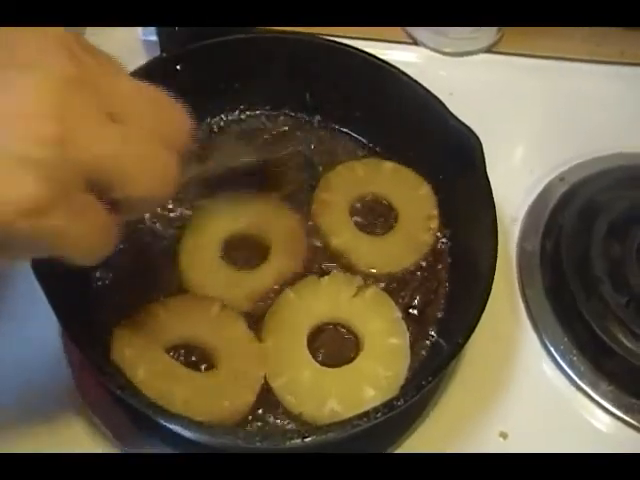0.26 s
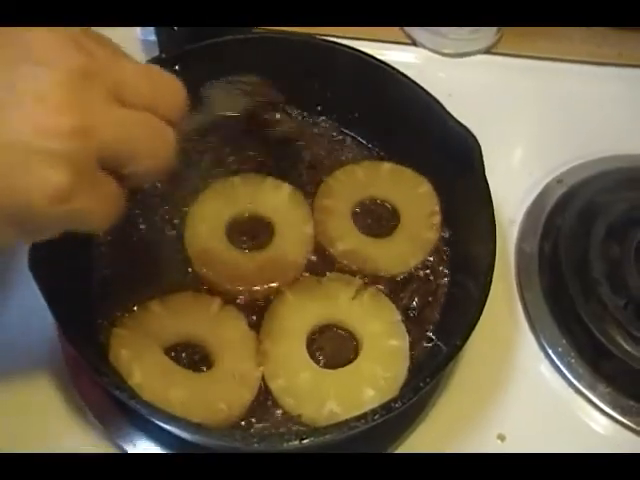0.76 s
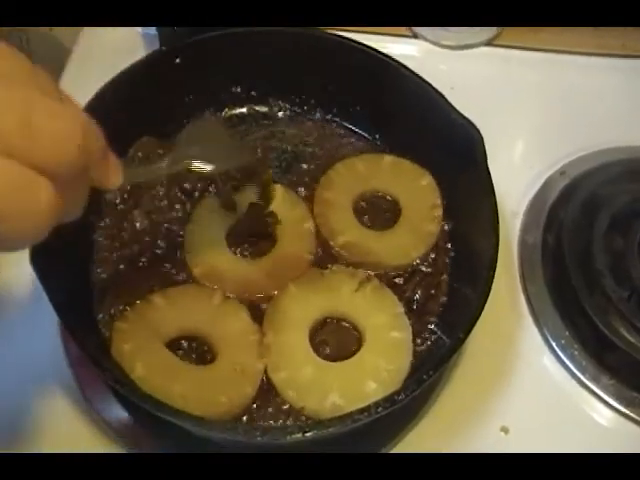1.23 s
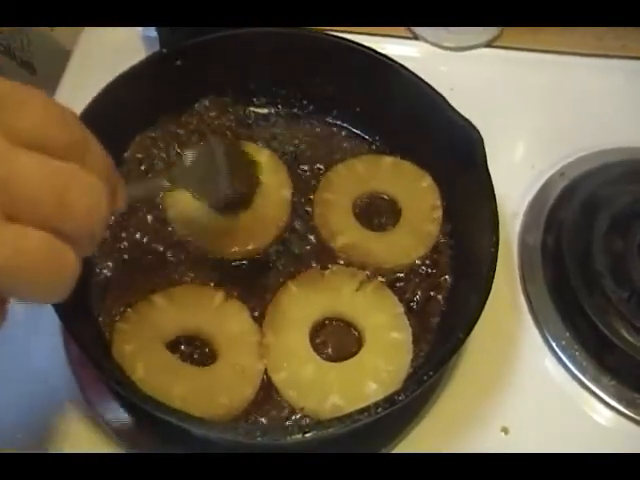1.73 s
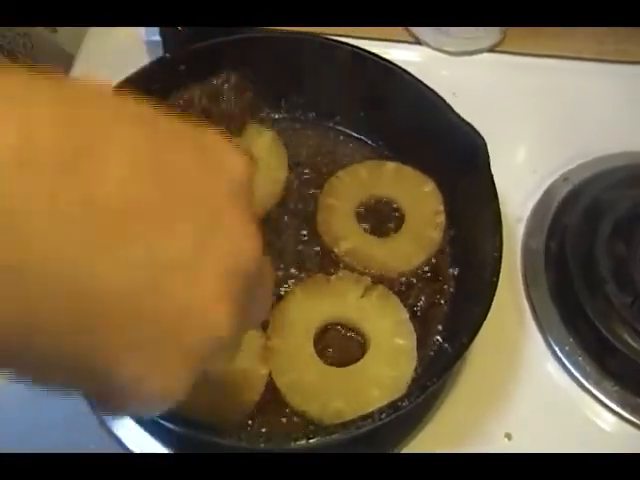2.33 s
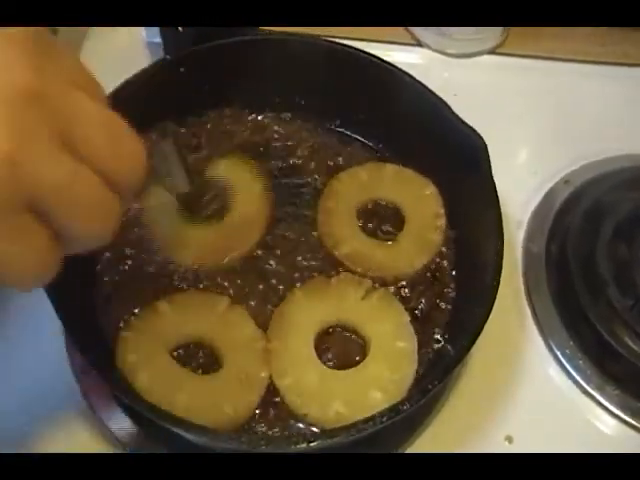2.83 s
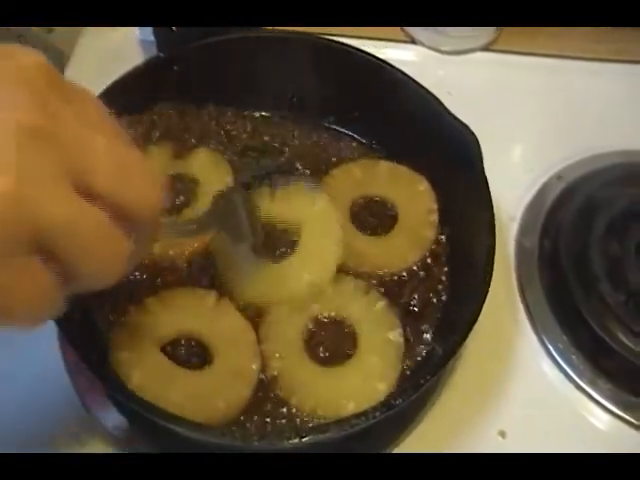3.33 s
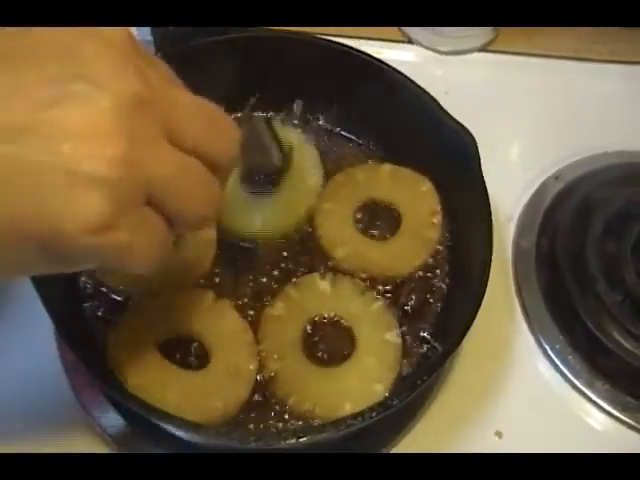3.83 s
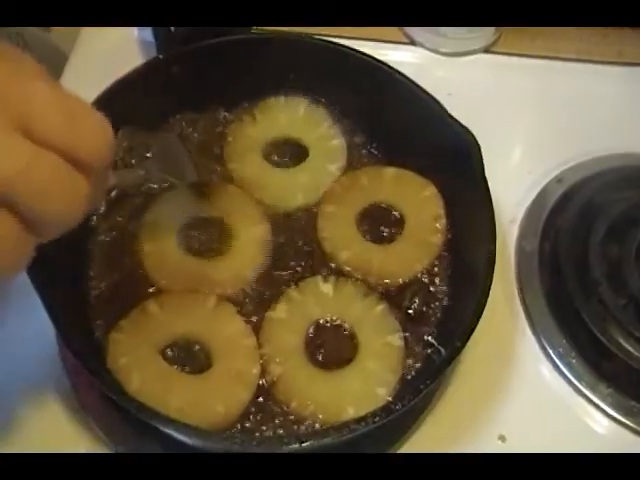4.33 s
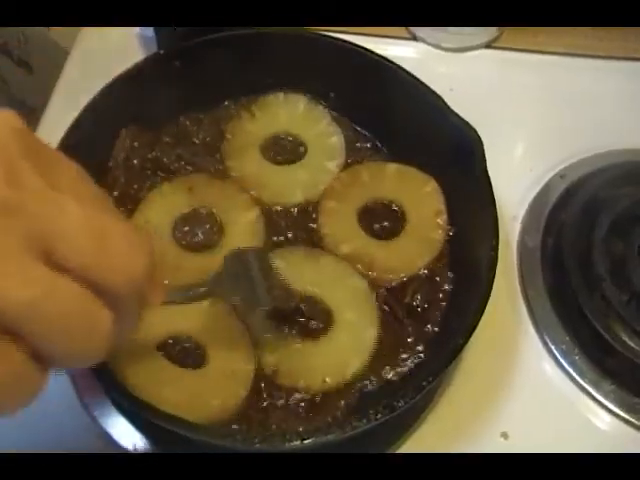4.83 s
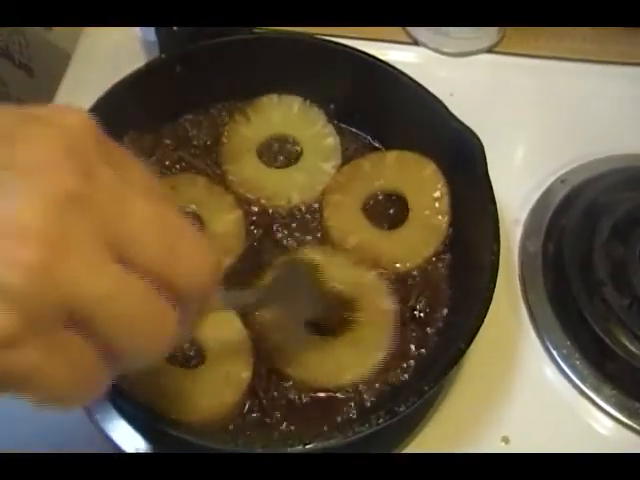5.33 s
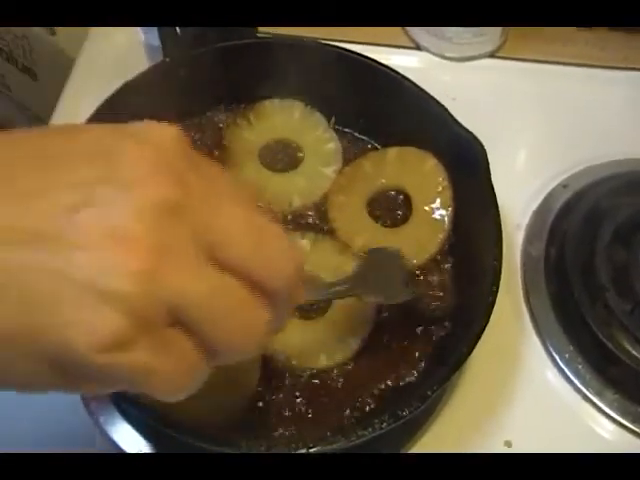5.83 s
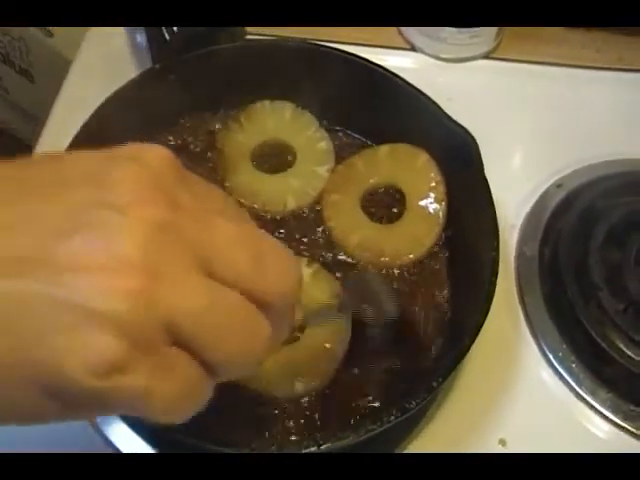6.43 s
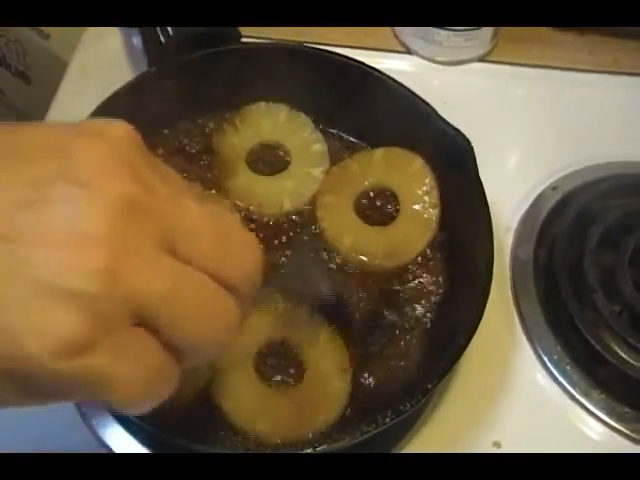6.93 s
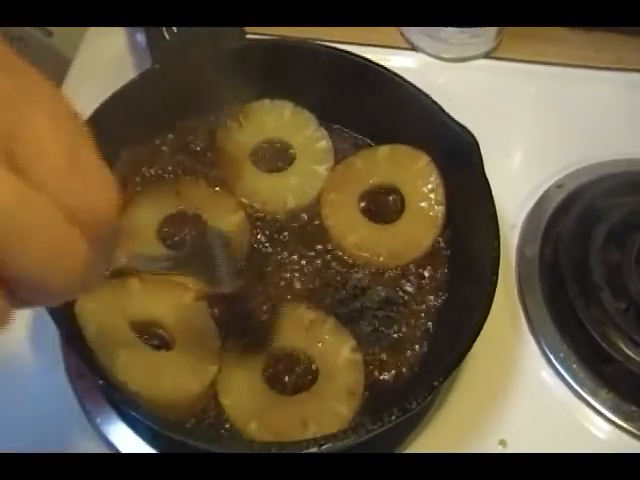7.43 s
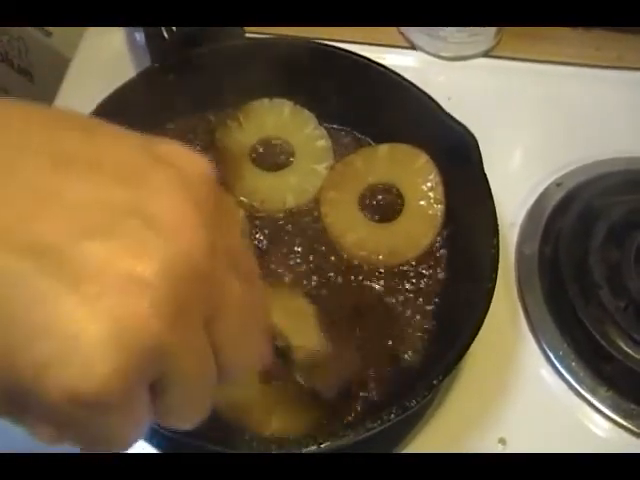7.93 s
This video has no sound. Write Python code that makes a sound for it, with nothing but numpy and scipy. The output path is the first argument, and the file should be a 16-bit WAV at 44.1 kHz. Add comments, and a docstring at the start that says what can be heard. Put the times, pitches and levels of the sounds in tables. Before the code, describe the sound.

Close, dense frying of fruit in bubbling syrup, broken by short metallic fork scrapes, dull pan shifts on the burner and snapping pops.

```python
"""Pineapple rings fry in bubbling caramel in a cast-iron pan on an electric stove, heard from close above.
Throughout: thousands of damped bubble rings a second over noise froth, flaring where syrup meets bare hot
iron; low rumble, hum and a faint pan tone. From 0.2 s a fork scrapes and knocks (stick-slip jolts drive pan
modes); from 0.5 s the pan shifts on its burner (the same on stove modes). At 1.3 s a dragged ring groans
(arching low tone), at 1.9 s the first loud syrup spit snaps (damped sine, spray); the fork resumes at 3.1 s."""
import sys
import numpy as np
from scipy import signal
from scipy.fft import rfft, irfft
from scipy.io import wavfile
from scipy.ndimage import uniform_filter1d

SR = 44100
rng = np.random.default_rng(int(sys.argv[2]) if len(sys.argv) > 2 else 0)


def inscribe(sig):
    """Save sig as 16-bit PCM at rate SR to the path in sys.argv[1].

    A 1-D sig is mono; a 2-D sig holds one channel per row.
    Samples are clipped to [-1, 1] before scaling.
    """
    pcm = np.round(np.clip(np.atleast_2d(sig).T, -1, 1) * 32767)
    wavfile.write(sys.argv[1], SR, pcm.astype(np.int16))


N = 360297
TIME = np.arange(N) / SR
BINS = np.fft.rfftfreq(N, 1 / SR)

# frying strength: [t/s, bubbling strength/dB, fine spray strength/dB]
FRYING_STRENGTH = [(0.0, -23, -25.5), (0.55, -23, -26), (1.25, -24.5, -26.0), (1.6, -26.5, -27.5),
                   (2.3, -26.5, -28.5), (2.9, -27.5, -29.5), (3.35, -29, -28), (3.68, -27.6, -30.1),
                   (4.0, -23.5, -28.0), (4.48, -22, -28), (4.7, -26.5, -26), (5.1, -25.5, -26.5),
                   (5.85, -21.5, -25.5), (6.35, -23.7, -26.5), (6.7, -22.9, -25.5), (7.5, -23.5, -25.5),
                   (8.17, -26.5, -27)]
# sizzle colour: [f/Hz, relative level/dB]
SIZZLE_COLOUR = [(200, -12), (450, -15.5), (620, -14), (720, -8.5), (950, -11), (1180, -9.5), (1330, -2),
                 (2300, -2), (2950, -4), (4600, -3.5), (5700, -5), (6900, -9.5), (9000, -7), (12000, -13)]
# resonances of the pan hollow: [f/Hz, width/Hz, lift/dB]
HOLLOW_RESONANCES = [(690, 45, 4.5), (801, 99, 9), (824, 20, -16.5), (946, 72, 6), (1066, 29, 5.5),
                     (1050, 39, -5), (1470, 280, 2.5), (1740, 83, -3), (2120, 130, 2.5)]
# weight of spray strength against bubbling strength at each pitch: [f/Hz, share 0-1]
SPRAY_FOLLOWING = [(2300, 0.42), (4200, 0.58), (7500, 1)]
# syrup pushed onto bare hot iron: [t/s, length/s, lift/dB, f/Hz]
SYRUP_FLARES = [(0.18, 0.14, 2, 3000), (0.465, 0.056, 1, 7000), (0.848, .12, 1.5, 5930),
                (1.864, .04, 2.5, 5000), (3.203, .06, 2, 4500), (3.493, .03, 3, 4500),
                (3.66, 0.035, 3.5, 4000), (3.856, 0.069, 3.5, 4500), (3.93, .05, 4, 5500),
                (4.093, 0.087, 2.5, 3800), (5.138, 0.063, 5, 5200), (5.214, 0.035, 6.5, 6000),
                (5.315, .07, 4.8, 6200), (5.46, 0.086, 2.7, 4400), (5.6, .17, 3.5, 5070),
                (5.64, 0.069, 4.5, 10600), (6.555, 0.064, 3, 9000)]
# spells of ringing colour in the sizzle: [start t/s, end t/s, f/Hz, lift/dB]
RINGING_SPELLS = [(.1, 2.6, 5560, 2), (3.9, 5.1, 2150, 3.5), (4.25, 5.2, 1540, 4.5), (5.15, 5.5, 3280, 3),
                  (6.95, 7.3, 2700, 4.5)]
# fork strokes on the iron: [t/s, length/s, level before trim/dB, chatter at start f/Hz, bite 0-1]
FORK_STROKES = [(0.183, 0.13, -26.5, 830, 0), (0.554, .06, -17.5, 760, 1), (0.894, 0.086, -18.5, 1320, 0.4),
                (3.102, 0.035, -25.5, 850, .15), (3.556, .026, -25.5, 760, 0.3),
                (3.67, 0.084, -27.5, 760, 0), (3.731, 0.069, -20.5, 880, 1), (4.047, 0.024, -27.5, 800, 0),
                (4.105, 0.055, -22, 770, .35), (5.414, 0.03, -21.5, 802, 0.04),
                (5.57, 0.13, -28, 790, 0.06), (5.739, 0.042, -26, 790, 0.1), (6.376, 0.068, -22, 830, .1),
                (6.46, 0.085, -25, 900, 0.25), (6.877, 0.062, -25, 880, 0.3),
                (7.24, 0.096, -27.5, 910, 0.3), (7.47, 0.095, -23.5, 756, 0.44),
                (7.742, 0.028, -31, 800, 0), (8.115, 0.066, -23.5, 850, .15)]
# pan modes: [f/Hz, relative level/dB, t60/s]
PAN_MODES = [(693, -0.5, 0.057), (748, 0, 0.12), (802, 3, 0.056), (919, -0.5, 0.11), (1022, -3.5, 0.14),
             (1330, 3, 0.073), (1426, 4, 0.034), (1560, 2.5, 0.017), (1900, 1.5, 0.023), (2263, 3.5, 0.033),
             (2580, 4, 0.032)]
# pan shifts on the burner: [t/s, length/s, level before trim/dB, chatter f/Hz]
PAN_SHIFTS = [(0.549, 0.096, -36, 500), (1.046, 0.051, -34, 260), (6.37, 0.132, -26, 172),
              (6.883, .025, -38, 330), (7.28, 0.043, -34, 160), (7.443, .075, -27, 330),
              (7.56, 0.021, -32, 420), (8.116, .05, -34, 570)]
# burner and stove-top modes: [f/Hz, relative level/dB, t60/s]
STOVE_MODES = [(86.5, 4.5, 0.1), (113, 3.5, 0.078), (175, -2.5, 0.15), (252, 2, .08), (320, -7, 0.04),
               (364, 0, 0.13), (471, 1.5, 0.16), (550, -2, 0.065), (646, 5, 0.089)]
# loud single spits of syrup: [t/s, level before trim/dB, f/Hz]
SYRUP_SPITS = [(1.87, -13, 4200), (2.6517, -19, 3150), (3.5013, -13, 4010), (3.866, -13, 4330),
               (5.9034, -28, 2310), (7.0784, -10, 4000)]
# room rumble colour: [f/Hz, relative level/dB]
RUMBLE_COLOUR = [(4, -28), (14, -0.5), (24, 2.5), (40, -12.5), (60, -4.5), (82, -7), (100, -12),
                 (120, -7.5), (150, -29.5), (270, -16), (500, -28), (2000, -63)]
# room rumble strength: [t/s, level before trim/dB]
RUMBLE_STRENGTH = [(0.0, -35), (1.0, -33.5), (1.2, -38.8), (1.8, -34.5), (2.5, -35.5), (2.8, -40),
                   (3.6, -34), (4.3, -40.5), (4.7, -37), (5.9, -38.2), (6.45, -34), (6.75, -34),
                   (7.5, -32.4), (8.17, -39)]
# steady low tones, the lowest a hum, the 260 Hz one a faint pan ring: [f/Hz, rms level/dB]
LOW_TONES = [(59, -43.5), (177, -74), (260, -61.5)]
# stereo width: [f/Hz, side gain/dB]
SIDE_GAIN = [(60, -14.5), (200, -12), (450, -14), (760, -13.5), (1080, -7.5), (1450, -19), (1800, -9.5),
             (2400, -10), (3000, -6.5), (4200, -9.5), (5400, -6.5), (6900, -1.5), (9500, -5.8),
             (12000, -6.5)]
# microphone mismatch: [f/Hz, left minus right level/dB]
MIC_LEVEL_LEAN = [(60, -.4), (800, 0), (1700, 0), (2400, 2.2), (3300, 0), (5300, -0.6), (6600, 1.5),
                  (7800, 2), (9500, 1.5), (12000, 1.5)]
# microphone mismatch: [f/Hz, phase lead of left/rad]
MIC_PHASE_LEAD = [(2500, -0.035), (2900, 0.2), (4800, 0), (6400, -0.77), (7400, -0.055), (8400, -.2),
                  (10000, 0)]

BUBBLING_BAND_HZ, SPRAY_BAND_HZ = (1300, 2700), (6500, 12000)
FLARE_RISE_S, FLARE_FALL_S, FLARE_OCTAVES = 0.0078, 0.027, 0.7
RING_WIDTH_SHARE, RING_FADE_S = 0.089, 0.04  # width as a share of the pitch
CLIMB_OCTAVES, FORK_REACH_OCTAVES = 1.8, 0.36  # climb at full bite
SHIFT_REACH_OCTAVES = 0.66
GROAN_S, GROAN_LENGTH_S, GROAN_FADE_S, GROAN_TONE_DB = 1.28, 0.98, 0.049, -41.5
GROAN_END_HZ, GROAN_TOP_HZ = 96.5, 141
EDGE_HZ = 12080


def sizzle(froth_db=2, flutter_db=0.5, patchy_db=1):
    """Bursts over froth; low pitches blend bubbling and spray strength, the highest follow spray alone."""
    steam = bursts(per_s=4200, spread_db=3, cycles=2.0, clump_db=1.24, echo=0.96, echo_s=0.0071)
    steam = steam + amp(froth_db) * rng.standard_normal((2, N))
    steam = steam * amp(flutter_db * wander(45))
    hz, t, z = signal.stft(steam, SR, nperseg=1024, noverlap=768)

    colour_db = read(SIZZLE_COLOUR, hz)[:, None]
    colour_db = colour_db + sum(db * bell(hz, f, width) for f, width, db in HOLLOW_RESONANCES)
    for start, end, f, db in RINGING_SPELLS:
        presence = gate(t - start, end - start, RING_FADE_S, RING_FADE_S)
        colour_db = colour_db + db * bell(hz, f, RING_WIDTH_SHARE * f) * presence
    # foam patches swell and collapse, each at its own pitch
    patches = uniform_filter1d(rng.standard_normal(z.shape[1:]), size=8, axis=1)
    patches = unit(uniform_filter1d(patches, size=9, axis=0))
    z = z * amp(colour_db + patchy_db * patches)

    s, bubbling_db, spray_db = np.transpose(FRYING_STRENGTH)
    mean_db = bubbling_db.mean()
    # the deepest gurgle follows the heat less closely
    following = read([(600, 0.24), (1400, 0.9)], hz)
    swing_db = np.outer(following, np.interp(t, s, bubbling_db) - mean_db)
    low_db = mean_db + swing_db - band_level(hz, z, BUBBLING_BAND_HZ)
    high_db = np.interp(t, s, spray_db) - band_level(hz, z, SPRAY_BAND_HZ)
    share = read(SPRAY_FOLLOWING, hz)[:, None]
    z = z * amp((1 - share) * low_db + share * high_db + flares(hz, t))
    return signal.istft(z, SR, nperseg=1024, noverlap=768)[1][:, :N]


def bursts(per_s, spread_db, cycles, clump_db, echo, echo_s, count=28):
    """Bubbles of many sizes burst at random places, each a short damped ring; spectrum about flat."""
    t, out = np.arange(1024) / SR, np.zeros((2, N))
    for hz in np.geomspace(500, 12000, count):
        at, chance, size, place = rng.random((4, 8000))
        # small bubbles are the most numerous
        share = per_s * N / SR / count / len(at) * np.sqrt(hz / 3000)
        size_db = np.minimum(-spread_db * np.log(1 - size), 7.5)
        at = (at * N).astype(int)
        clump = amp(clump_db * np.tanh(wander(35)[at]))  # bursts come in clusters
        size = amp(size_db) * (chance < share) * clump * rng.choice([-1, 1], len(at))
        mid = np.bincount(at, size, N)
        side = np.bincount(at, size * np.sqrt(2) * np.cos(np.pi * place), N)
        # pan wall and stove top throw each burst back within milliseconds
        walls = rng.standard_normal(len(t)) * np.exp(-t / echo_s)
        paths = (t == 0) + echo * walls / np.linalg.norm(walls)
        ring = np.convolve(np.exp(-t * hz / cycles) * np.sin(2 * np.pi * hz * t), paths)
        popping = signal.oaconvolve(np.array([mid, side]), ring[None], axes=1)[:, :N]
        out += np.sqrt(hz) * unit(popping)
    return unit(out)


def flares(hz, t):
    """Lift in dB: each flare catches quickly, holds and dies away in a broad band round its pitch."""
    lift_db = 0
    for s, length, db, pitch_hz in SYRUP_FLARES:
        band = np.exp(-0.5 * (np.log2((hz + 1) / pitch_hz) / FLARE_OCTAVES) ** 2)
        swell = gate(t - s, length + FLARE_FALL_S / 2, FLARE_RISE_S, FLARE_FALL_S)
        lift_db = lift_db + db * np.outer(band, swell)
    return lift_db


def fork(trim_db=-1):
    """The fork scrapes the iron and rings the pan; the harder it bites, the further the chatter climbs."""
    out = np.zeros((2, N))
    for s, length, db, hz, bite in FORK_STROKES:
        stroke = scrape(PAN_MODES, length, hz, CLIMB_OCTAVES * bite, FORK_REACH_OCTAVES,
                        spill_db=-5, slips_per_s=1100, grit=0.4, ease=0.24, edge=0.1)
        add(out, s, amp(db + trim_db) * stroke)
    return out


def burner(trim_db=-1):
    """The pan judders on the burner and rings the stove top."""
    out = np.zeros((2, N))
    for s, length, db, hz in PAN_SHIFTS:
        judder = scrape(STOVE_MODES, length, hz, 0, SHIFT_REACH_OCTAVES,
                        spill_db=-1, slips_per_s=250, grit=0.097, ease=0.37, edge=0.19)
        add(out, s, amp(db + trim_db) * judder)
    return out


def scrape(modes, length_s, first_hz, climb_octaves, reach_octaves, spill_db, slips_per_s, grit, ease, edge):
    """Stick-slip jolts drive hardest the modes near the chatter pitch; rms 1 over the contact length."""
    t = np.arange(SR // 6) / SR
    count = int(np.clip(length_s * SR, 64, len(t)))
    chance = rng.random(count)
    jolt = rng.standard_normal((2, count))
    progress = t[:count] / length_s
    pressure = signal.windows.tukey(count, edge) * np.exp(-ease * progress)  # lands hard, then eases
    slips = jolt * (grit + (chance < slips_per_s / SR)) * pressure
    chatter_hz = first_hz * 2 ** (climb_octaves * progress ** 2)  # climbs slowly at first
    sound = 0
    for k, (f, mode_db, t60) in enumerate(modes):
        nearness = np.exp(-0.5 * (np.log2(f / chatter_hz) / reach_octaves) ** 2)
        drive = slips * (amp(spill_db) + nearness)
        ring = (-1) ** k * amp(mode_db - 60 * t / t60) * np.sin(2 * np.pi * f * t) / np.sqrt(t60)
        sound = sound + signal.fftconvolve(drive, ring[None], axes=1)
    return sound * np.sqrt(count / np.sum(sound ** 2, 1, keepdims=True))


def spits(trim_db=-3, ring_s=0.0018, spray_db=-13, spray_s=0.004):
    """A big bubble snaps, a damped sine, and throws a brief spray of noise."""
    out, t = np.zeros((2, N)), np.arange(1200) / SR
    for s, db, hz in SYRUP_SPITS:
        spray = np.diff(rng.standard_normal((2, len(t) + 1))) / 2 * np.exp(-t / spray_s)
        placing = np.array([[1], [rng.uniform(-0.83, 1)]])  # mid, side
        snap = np.sin(2 * np.pi * hz * t) * np.exp(-t / ring_s) * placing
        add(out, s, amp(db + trim_db) * (snap + amp(spray_db) * spray))
    return out


def groan(jitter=0.052, octave_db=-12, arch=0.5):
    """A ring dragged across the pan: an unsteady judder, pitch in one arch, over a dull rumble."""
    t = TIME - GROAN_S
    speed = np.sin(np.pi * np.clip(t / GROAN_LENGTH_S, 0, 1)) ** arch
    hz = GROAN_END_HZ + (GROAN_TOP_HZ - GROAN_END_HZ) * speed
    turn = 2 * np.pi * np.cumsum(hz * (1 + jitter * wander(50))) / SR
    tone = np.sqrt(2) * (np.sin(turn) + amp(octave_db) * np.sin(2 * turn + wander(30)))
    dull = signal.butter(2, [55, 135], "band", fs=SR, output="sos")
    rumble = unit(signal.sosfilt(dull, rng.standard_normal(N)))
    return amp(GROAN_TONE_DB) * (tone + rumble) * gate(t, GROAN_LENGTH_S, GROAN_FADE_S, GROAN_FADE_S)


def kitchen(rumble_trim_db=1.5, surge_db=0.8):
    """Low, uneven room rumble of shaped noise, a slightly wavering low hum and a faint pan tone."""
    rumble = unit(irfft(rfft(rng.standard_normal((2, N))) * amp(read(RUMBLE_COLOUR, BINS)), N))
    level_db = np.interp(TIME, *np.transpose(RUMBLE_STRENGTH)) + rumble_trim_db
    out = rumble * amp(level_db + surge_db * wander(6.8))
    drift_rad = 0.4 * wander(4)
    for hz, db in LOW_TONES:
        out[0] += amp(db) * np.sqrt(2) * np.sin(2 * np.pi * hz * TIME + drift_rad)
    return out


def amp(db):
    """Decibels to gain."""
    return 10 ** (np.asarray(db) / 20)


def unit(x):
    """Scales to rms 1."""
    return x / np.sqrt(np.mean(x ** 2) + 1e-20)


def read(points, hz):
    """Reads a spectrum on a log-frequency axis."""
    f, value = np.transpose(points)
    return np.interp(np.log(hz + 1), np.log(f + 1), value)


def add(mix, s, sound):
    """Mixes a sound in at time s."""
    part = mix[:, max(round(s * SR), 0):][:, :sound.shape[1]]
    part += sound[:, :part.shape[1]]


def wander(hz):
    """Slow chance of rms 1 that changes about hz times a second."""
    knots = rng.standard_normal(4000)
    return unit(np.interp(TIME * hz, np.arange(len(knots)), knots))


def bell(hz, centre_hz, width_hz):
    """Shape of a resonance, 1 at its centre, as a column."""
    return 1 / (1 + (2 * (hz[:, None] - centre_hz) / width_hz) ** 2)


def gate(t, length_s, rise_s, fall_s):
    """Attack, hold and release, from 0 to 1 and back."""
    return np.clip(np.minimum(t / rise_s, (length_s - t) / fall_s), 0, 1)


def band_level(hz, z, band_hz):
    """Mean level in dB of one band of the mid channel's short-time spectra."""
    inside = (hz > band_hz[0]) & (hz < band_hz[1])
    power = np.mean(abs(z[0, inside]) ** 2, 1).sum()
    return 10 * np.log10(power * 4 / 3)  # one-sided spectrum, Hann window


def ports(pair):
    """Mid and side to left and right, the side weighted by frequency."""
    side = irfft(rfft(pair[1]) * amp(read(SIDE_GAIN, BINS)), N)
    return np.array([pair[0] + side, pair[0] - side])


def scene():
    """All sources as mid and side, then spread to the two channels."""
    pair = sizzle() + fork() + burner() + spits() + kitchen()
    pair[0] += groan()
    return ports(pair)


def record(dry):
    """Two slightly unlike microphones, then the band limit."""
    halves = [0.5, -0.5]
    level = amp(np.outer(halves, read(MIC_LEVEL_LEAN, BINS)))
    phase = np.exp(1j * np.outer(halves, read(MIC_PHASE_LEAD, BINS)))
    heard = irfft(rfft(dry) * level * phase, N)
    lowpass = signal.firwin(1023, EDGE_HZ, window=("kaiser", 9), fs=SR)
    return signal.oaconvolve(heard, lowpass[None], "same")


dry = scene()
out = record(dry)
inscribe(out)
```